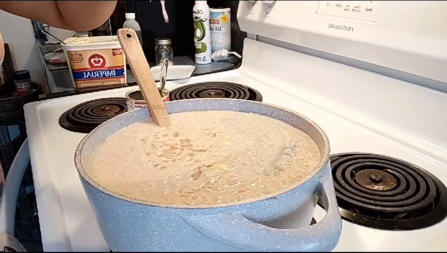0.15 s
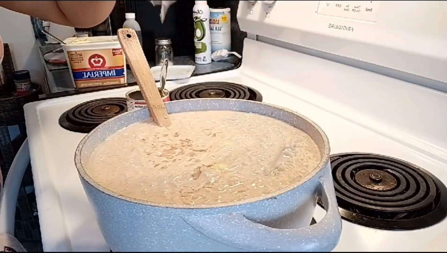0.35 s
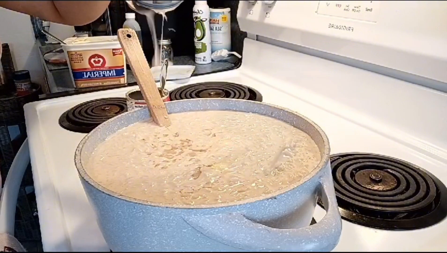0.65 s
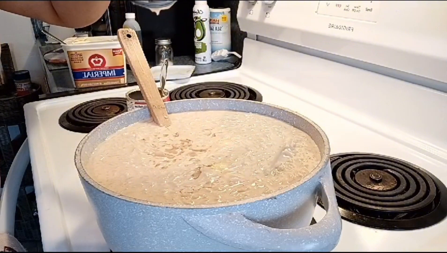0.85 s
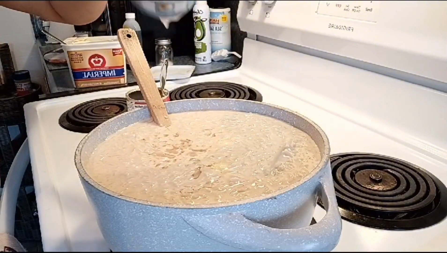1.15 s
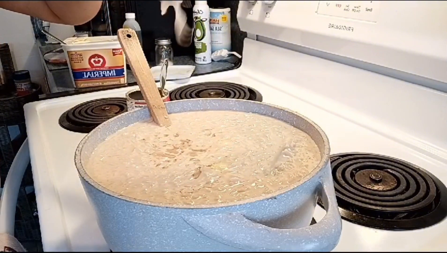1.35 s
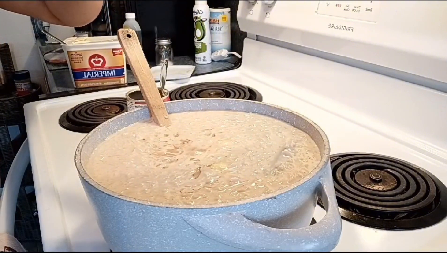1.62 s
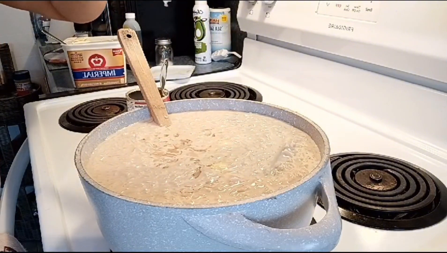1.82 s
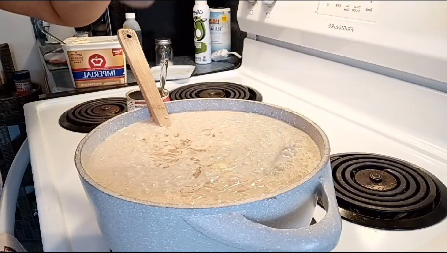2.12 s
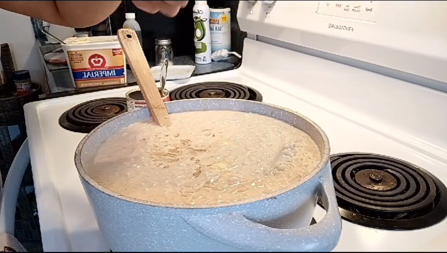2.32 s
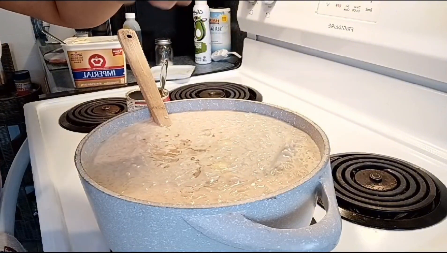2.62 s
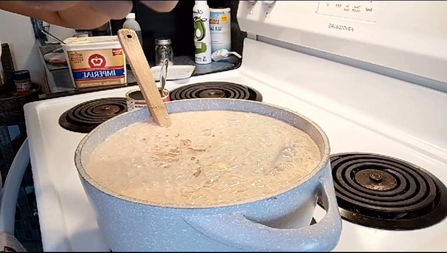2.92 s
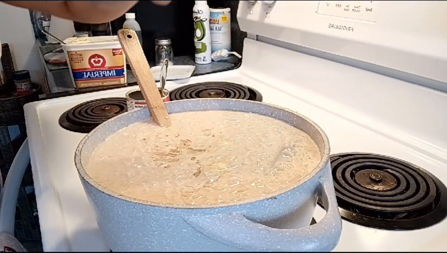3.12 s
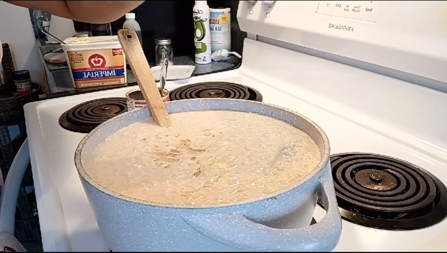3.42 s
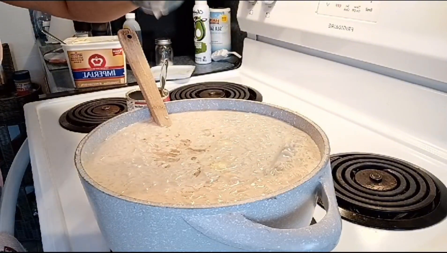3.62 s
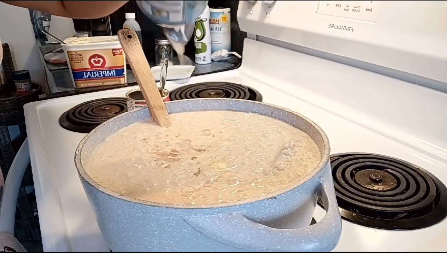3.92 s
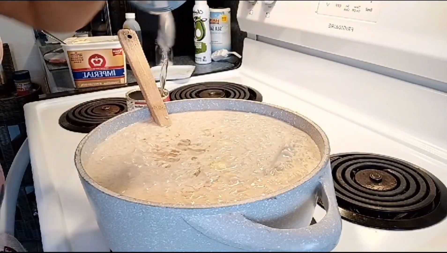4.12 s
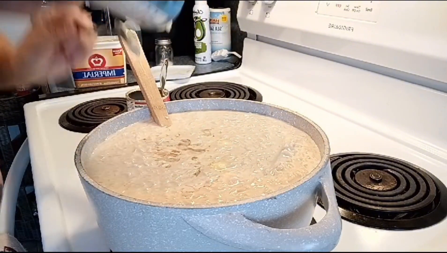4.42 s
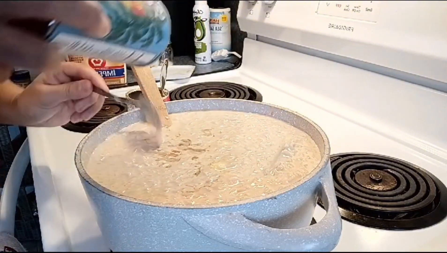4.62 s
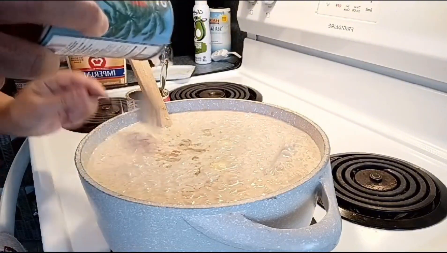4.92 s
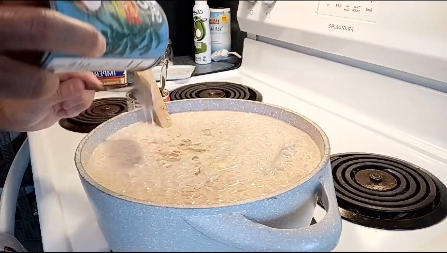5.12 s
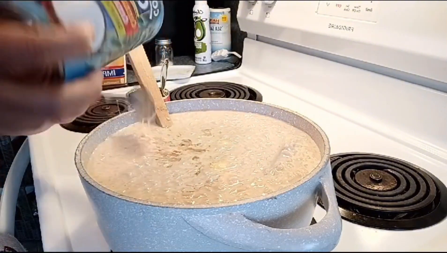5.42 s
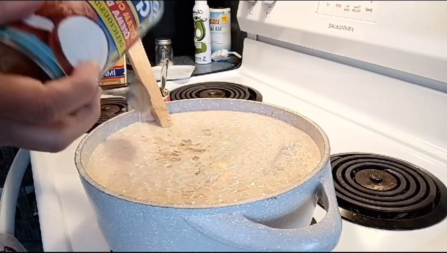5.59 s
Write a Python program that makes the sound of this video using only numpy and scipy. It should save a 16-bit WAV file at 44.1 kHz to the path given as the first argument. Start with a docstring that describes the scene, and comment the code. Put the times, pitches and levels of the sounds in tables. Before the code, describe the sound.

Close stereo pickup of a tin can being emptied with a spoon: irregular scratches and muffled tinny knocks, a quieter scratchy passage, a bright clang, a long harsh scrape ending in strong knocks, low lubricated wipes, then ten evenly spaced piercing metal clacks, slightly right, each with a clattering kitchen reverberation. A wavering appliance hum and low rumble lie beneath.

```python
"""Scraping out a tin can

A metal spoon scrapes and knocks thick contents out of a tin can held over a pot, in a small kitchen.
Stick-slip friction or a blow excites the air in the can, the modes of its tin wall and a gritty edge.
A few soft wipes groan with little grit; then can and spoon are rapped together ten times close to the
microphone, the last wipe among the raps. The kitchen answers, over rumble, hiss and a wavering hum."""
import sys
import numpy as np
from scipy import signal
from scipy.fft import rfft, irfft
from scipy.io import wavfile

SR = 44100
rng = np.random.default_rng(int(sys.argv[2]) if len(sys.argv) > 2 else 0)


def waveform_to_disk(signal):
    """Save audio, clipped to [-1, 1], as 16-bit WAV at the path in sys.argv[1]."""
    frames = np.transpose(np.atleast_2d(signal))
    scaled = np.clip(frames, -1, 1) * 32767
    samples = np.round(scaled).astype(np.int16)
    wavfile.write(sys.argv[1], SR, samples)


N = 253569
TIME = np.arange(N) / SR
RING = TIME[:28000]  # time axis of every impulse response [s]

# modes of the tin wall, before scatter and extra damping:
# (frequency [Hz], relative level [dB], t60 [s])
WALL_MODES = [(550, -25.5, 0.099), (621, -10.5, 0.29), (970, -24.5, 0.025), (1243, -3.5, 0.18),
              (1280, 3, 0.22), (1340, -23, 0.064), (1864, -13, 0.078), (2400, -8, 0.039), (2424.4, 4, .13),
              (3130, -11, 0.16), (3490, -3, 0.09), (4820, -23, 0.15), (5297, -21, .15), (5610, -22.5, .15),
              (6905, -12.5, 0.23)]


def scrapes(hollow_hz=621, wall_db=-1.0, bare_bright_db=8, coat_dull_db=21):
    """Stick-slip friction: short strokes of the spoon, gritty and bright where it is bare."""
    # short scrapes: (time [s], length [s], pressure level [dB], coating [0-1],
    # wall ring over the hollow, before wall_db [dB])
    strokes = [(0, 0.039, -60, 0, -4), (.118, .054, -60.5, 0.21, 1.5), (0.293, .02, -57, 0.34, -18),
               (0.647, .028, -63.5, 0.11, 6), (.685, .045, -50, 0.46, -18), (.762, .095, -53, 0.54, -7),
               (.854, .068, -61, .06, 2), (.938, 0.069, -48, 0.32, -7), (1.435, .084, -58.5, .13, -2.5),
               (1.549, .16, -62.5, .42, -7.5), (1.856, .064, -61.5, 0.5, -14.5),
               (1.989, 0.075, -73, 0.68, 1), (2.173, .045, -66, 0.1, -6.5), (2.335, .055, -66, .54, -6.5),
               (2.394, .053, -70.5, 0.16, -21), (2.481, .062, -63, 0.56, -20), (2.552, .13, -59, .04, -16),
               (2.683, .049, -61.5, 0.15, 11), (2.77, 0.099, -52.5, .33, -2.5), (2.89, .05, -64, 0.24, -11)]
    out = np.zeros(N)
    for s, length, db, coating, ring_db in strokes:
        air = stroke(length, db)
        ring = air * undb(ring_db + wall_db)
        edge = air * undb(grit_db(coating))
        bright_db = bare_bright_db - coat_dull_db * coating
        add(out, s, drag(hollow_hz, air, ring, edge, bright_db))
    return out


def long_scrape(hollow_hz=655, wall_db=0.5, edge_db=2, bright_db=3, release_db_per_s=400):
    """Sustained friction: one hard sweep round the can that dies away as the spoon lifts."""
    # levels before wall_db and edge_db:
    # (time [s], hollow level [dB], wall ring level [dB], grit level [dB])
    sweep = [(3.13, -67, -59, -73), (3.21, -48, -49, -60), (3.24, -42, -52, -43.5),
             (3.276, -35.5, -41.5, -46.5), (3.328, -35, -32.5, -39.5), (3.382, -38, -34, -48),
             (3.416, -35.5, -33.5, -41.5), (3.47, -44.5, -50, -44)]
    s, *levels = np.transpose(sweep)
    t = np.arange(s[0], s[-1] + .15, 1 / SR)
    release_db = release_db_per_s * np.maximum(t - s[-1], 0)
    air, ring, edge = (undb(np.interp(t, s, db) - release_db) for db in levels)
    out = np.zeros(N)
    add(out, s[0], drag(hollow_hz, air, ring * undb(wall_db), edge * undb(edge_db), bright_db))
    return out


def wipes(wall_db=-15, edge_db=-37, bright_db=-3):
    """Lubricated friction: a thickly coated spoon groans, mostly lower, almost without grit."""
    # (time [s], length [s], hollow pitch [Hz], pressure level [dB])
    soft_strokes = [(3.662, 0.152, 421, -46), (3.684, .15, 580, -46.5), (3.979, .13, 365, -55),
                    (5.469, .21, 558, -50)]
    out = np.zeros(N)
    for s, length, hz, db in soft_strokes:
        air = stroke(length, db)
        add(out, s, drag(hz, air, air * undb(wall_db), air * undb(edge_db), bright_db))
    return out


def stroke(length, db, crest=.42, curve=0.7):
    """Contact pressure: a stroke swells to a crest, at a share of its length, and eases off."""
    share = np.linspace(0, 1, int(length * SR))
    progress = np.interp(share, [0, crest, 1], [0, .5, 1])
    swell = np.abs(np.sin(np.pi * progress)) ** curve  # a lower power gives a fuller swell
    return swell / rms(swell) * undb(db)


def grit_db(coating, bare_db=15, coat_loss_db=45.5):
    """Damping at the contact: contents on the spoon muffle the grit, given as level over the hollow."""
    return bare_db - coat_loss_db * coating


def drag(hz, air, ring, edge, bright_db, contact_hz=1800, octave_db=20, steady_db=55, catch_db=2.5):
    """Source and resonators: coarse slips shake the hollow and the tin, fine ones hiss."""
    size = len(air)
    coarse = friction(size, slips_per_s=300, spread_db=5.5, slide=0.45)
    fine = coarse + friction(size, slips_per_s=2500, spread_db=7.0, slide=0.59)
    # the edge catches and lets go: a level drawn every 5 ms, held after the last draw
    catch = np.interp(TIME[:size], np.arange(64) * .005, rng.standard_normal(64))
    fine = fine * undb(catch_db * catch)
    tilt = [(1800, -bright_db / 2), (5500, bright_db / 2), (10000, bright_db)]
    hiss = colour(grit(t60=0.018), tilt)
    # a coated spoon has little grit: it pushes the wall softly and groans on a steadier pitch
    cut_hz = contact_hz * 2 ** (gap_db(edge, ring) / octave_db)
    push = soften(soften(coarse, cut_hz), cut_hz)
    swell_s = 0.0032 * 2 ** (max(gap_db(air, edge), 0) / steady_db)
    groan = rubbed(coarse, hollow(hz, swell_s), air)
    wall = rubbed(push, modes(WALL_MODES, scatter_db=-1.5), ring)
    return groan + wall + rubbed(fine, hiss, edge)


def friction(size, slips_per_s, spread_db, slide):
    """Stick-slip force of a sliding edge: uneven random slips over a fine sliding noise."""
    slipping = rng.random(size) < slips_per_s / SR
    strength = 2 * rng.random(size) - 1
    slips = slipping * undb(spread_db * strength)
    return slips / rms(slips) + slide * rng.standard_normal(size)


def rubbed(force, body, pressure):
    """Forced vibration: a body convolved with a force, with the energy of the pressure on it."""
    return unit(signal.fftconvolve(force * pressure, body)) * np.sqrt(np.sum(pressure ** 2))


def knocks(bare_ring_db=3, ring_loss_db=26, bare_hz=2000, coat_octaves=1.1, coated_t60=0.44):
    """Impact excitation: a coat of contents softens the contact and damps the can."""
    # spoon knocks inside the can:
    # (time [s], hollow pitch [Hz], hollow level before damping [dB], coating [0-1])
    hits = [(.2031, 600, -35.5, 0.77), (.2983, 570, -52, 0.57), (.556, 667, -36, .7),
            (.664, 810, -43.5, 0.45), (.698, 602, -43, .65), (.729, 570, -47.5, .97), (.819, 578, -42.5, 1),
            (0.8596, 640, -46, .09), (1.3078, 620, -36, .27), (3.402, 610, -33.5, .58),
            (3.414, 683, -36, 0.48), (3.4835, 611, -27.5, 0.84)]
    # one hard clang that sets the whole wall ringing: (time [s], hollow pitch [Hz],
    # hollow level [dB], wall ring level [dB], grit level [dB], contact hardness [Hz])
    clang = (2.9361, 668, -33.5, -23, -35.5, 5900)
    out = np.zeros(N)
    for s, hz, db, coating in hits:
        ring_db = db + bare_ring_db - ring_loss_db * coating
        hardness_hz = bare_hz * 2 ** (-coat_octaves * coating)
        hit = blow(hz, db, ring_db, db + grit_db(coating), hardness_hz)
        add(out, s, hit * fade(coated_t60) ** coating)
    add(out, clang[0], blow(*clang[1:]))
    return out


def blow(hz, air_db, ring_db, edge_db, hardness_hz, first_swing=0.4):
    """Contact time sets bandwidth: a bare, hard blow on the wall wakes the high modes."""
    # the contents soak up the first wide swings, then a thin ring remains
    wall = modes(WALL_MODES, scatter_db=-1) * (1 + first_swing * fade(t60=0.2))
    air = attack(hollow(hz, swell_s=0.0027), air_db)
    ring = attack(soften(wall, hardness_hz), ring_db)
    return air + ring + attack(grit(t60=.045), edge_db)


def hollow(hz, swell_s):
    """Resonance of an enclosed body of air: a few cycles that swell and die."""
    return unit(RING * np.exp(-RING / swell_s) * np.sin(2 * np.pi * hz * RING))


def modes(table, scatter_db):
    """Modal synthesis: decaying partials whose weights depend on the spot that is touched."""
    out = 0
    for hz, db, t60 in table:
        weight = undb(db + scatter_db * rng.standard_normal())
        out = out + weight * fade(t60) * np.sin(2 * np.pi * hz * RING)
    return out


def grit(t60):
    """High modal density: the quickly damped high modes of thin tin merge into coloured noise."""
    # steel edge on tin: (frequency [Hz], relative level per Hz [dB])
    edge_spectrum = [(200, -17.5), (400, -13.5), (1000, -3), (1450, -5.5), (1850, -1.5), (2700, -6),
                     (3200, -2.5), (3900, -9.5), (4600, -2.5), (5500, -1), (6700, -14), (8000, -28.5),
                     (9500, -22.5), (13500, -27), (15500, -14.5)]
    return unit(colour(rng.standard_normal(len(RING)) * fade(t60), edge_spectrum))


def soften(x, hz):
    """Low-pass action of contact: a softer contact pushes longer and loses its treble."""
    return signal.sosfilt(signal.butter(2, min(hz, SR / 3), fs=SR, output="sos"), x)


def raps(rim_hz=6600, right_db=3.5, clack_db=-1, clatter_db=-1, echo_db=-6, drift=0.63, tint=0.55,
         boom_hz=108, boom_db=-13.0, room_db=-15.5, lower_db=9, lower_slope=0.29, lower_db_per_hz=0.0044):
    """Direct and diffuse sound: a sharp clack of the rim, to the right, then a clatter fills the room."""
    # raps that shake the rest out:
    # (time [s], clack pitch [Hz], strength before clack_db [dB], edge brightness [dB])
    hits = [(4.3222, 6300, -30, -20), (4.4401, 6400, -21.5, 11.5), (4.6028, 6460, -21, -1),
            (4.7779, 6400, -19.5, 1.5), (4.9366, 6520, -18, 1), (5.0913, 6840, -19, 3),
            (5.2492, 6850, -18.5, 17), (5.407, 6820, -18, 17), (5.5763, 6700, -21, 13.5),
            (5.7335, 6560, -16, 21)]
    # modes of the rim held against the spoon, before pitch shift and scatter:
    # (frequency [Hz], relative level [dB], t60 [s])
    rim_modes = [(930, -11.5, 0.053), (2860, -11.5, 0.018), (3000, -38, 0.082), (3120, -7, 0.017),
                 (3210, -28.5, 0.23), (3986, -9, 0.023), (6400, 7.5, 0.014), (6850, 15.5, 0.011),
                 (8950, -2, 0.0097), (10760, -6, 0.0039), (14940, -2, 0.01)]
    # clatter of a rap as it fills the room: (frequency [Hz], relative level per Hz [dB])
    clatter_spectrum = [(45, -25), (108, 2.5), (145, 0.5), (235, 7), (330, 4.5), (850, 6.5), (1300, 1.5),
                        (2200, -4.5), (3000, -7.5), (4800, -6.5), (6600, 0.5), (7700, -5.5), (13500, -11),
                        (15200, -13)]
    out = np.zeros((2, N))
    room = kitchen(build_s=0.00066, bass_lag_s=0.039)
    for s, hz, near, edge in hits:
        far = near + room_db  # the room answers in proportion
        # a glancing or high-pitched rap drives the lower rim modes harder
        lower = lower_db + lower_slope * abs(edge) + lower_db_per_hz * (hz - rim_hz)
        # the point of contact shifts the damped modes and decides which ones speak
        rim = [(f * (hz / rim_hz if t60 < .1 else 1), db, t60) for f, db, t60 in rim_modes]
        spot = np.array([(1500, 0), (3000, lower), (5000, 0), (7500, 0), (12000, edge)])
        # an impulse, then the edges grind briefly; each microphone port sees another side of the can
        force = 0.11 * rng.standard_normal((2, len(RING))) * fade(t60=0.027)
        force[:, 0] += 1
        struck = signal.fftconvolve(force, modes(rim, scatter_db=-4.5)[None], axes=1)
        clack = colour(struck[:, :len(RING)], spot)
        clack[0] = np.roll(clack[0], 1)  # it reaches the left port one sample later
        # the can moves between raps, so the echoes change
        echoes = room + drift * kitchen(build_s=.0006, bass_lag_s=0.053)
        clatter = colour(colour(echoes, clatter_spectrum), spot * [1, tint])
        ringing = signal.fftconvolve(clack, echoes, axes=1)
        add(out, s, attack(clack, near + clack_db, count=88) * pan(right_db))
        add(out, s, attack(clatter, far + clatter_db, count=2600))
        add(out, s, attack(ringing, far + echo_db, count=2600))
        # a low mode of the room swells after the clack
        boom = hollow(boom_hz * (1 + 0.075 * rng.standard_normal()), swell_s=0.017)
        add(out, s + .022, attack(boom, far + boom_db, count=2600))
    return out


def kitchen(build_s, bass_lag_s):
    """Reverberation: echoes build up, lows late, and die exponentially band by band."""
    # (frequency [Hz], t60 [s])
    decay_times = [(100, 1), (500, 0.36), (2000, 0.35), (6500, 0.39), (10000, 0.3), (16000, 0.18)]
    noise = rfft(diffuse(len(RING)))
    hz = np.fft.rfftfreq(len(RING), 1 / SR)
    centres = np.geomspace(100, 16000, 9)
    out = 0
    for f, band in zip(centres, np.eye(len(centres))):
        echoes = irfft(noise * lookup(np.c_[centres, band], hz))  # overlapping triangular bands
        rise_s = build_s + bass_lag_s * np.sqrt(centres[0] / f)
        rise = 1 - np.exp(-(RING / rise_s) ** 2)
        out = out + echoes * rise * fade(lookup(decay_times, f))
    return out


def diffuse(size, wide_hz=350):
    """Diffuse-field coherence: stereo noise, alike in the bass and wide in the treble."""
    mid, side = rfft(rng.standard_normal((2, size)))
    hz = np.fft.rfftfreq(size, 1 / SR)
    side = side * hz / (hz + wide_hz)
    return irfft(np.array([mid + side, mid - side]), size)


def room_tone(air_db=-68.5, waver_db=4):
    """Stationary noise and tones: low rumble and faint hiss, with a wavering appliance hum."""
    # room noise: (frequency [Hz], relative level per Hz [dB])
    air_spectrum = [(30, -16), (50, -7), (75, 3.5), (120, 3.5), (200, -2.5), (400, -6.5), (800, -23.5),
                    (1600, -29), (3200, -29), (6300, -34.5), (10000, -31), (13000, -40.5), (15500, -31.5)]
    # appliance hum: (frequency [Hz], RMS level about which it wavers [dB])
    hum_tones = [(70, -72), (120, -74)]
    out = colour(diffuse(N), air_spectrum) * undb(air_db)
    knots = np.linspace(0, TIME[-1], 70)
    for hz, db in hum_tones:
        waver, wander = (np.interp(TIME, knots, row) for row in rng.standard_normal((2, 70)))
        level = np.sqrt(2) * undb(db + waver_db * waver)
        out = out + level * np.sin(2 * np.pi * hz * TIME + wander)  # the phase wanders [rad]
    return out


def undb(db):
    """Logarithmic level: decibels to amplitude gain."""
    return 10 ** (np.asarray(db) / 20)


def rms(x):
    """Effective value: root mean square, kept above zero."""
    return np.sqrt(np.mean(x ** 2)) + 1e-18


def gap_db(a, b):
    """Level difference: a over b."""
    return 20 * np.log10(rms(a) / rms(b))


def unit(x):
    """Energy normalisation: scale a response to unit energy."""
    return x / np.sqrt(np.sum(x ** 2))


def attack(x, db, count=441):
    """Onset level: scale a hit so that its first samples have this RMS level."""
    return x * undb(db) / rms(x[..., :count])


def fade(t60):
    """Exponential decay: 60 dB down after t60 seconds."""
    return np.exp(-np.log(1000) * RING / t60)


def pan(right_db):
    """Level-difference stereo: gains of the left and right channel."""
    return undb(np.array([[-right_db], [right_db]]) / 2)


def add(out, s, x):
    """Superposition: mix x into out from time s."""
    i = int(s * SR)
    out[..., i:i + x.shape[-1]] += x[..., :max(N - i, 0)]


def lookup(points, hz):
    """Logarithmic frequency axis: interpolate (Hz, value) points."""
    f, value = np.transpose(points)
    return np.interp(np.log(hz + 1), np.log(f), value)


def colour(x, points, size=4096):
    """Minimum-phase filtering by folded cepstrum: shapes white noise while keeping its power."""
    gain = undb(lookup(points, np.fft.rfftfreq(size, 1 / SR)))
    cepstrum = irfft(np.log(gain))
    cepstrum[1:size // 2] *= 2
    cepstrum[size // 2 + 1:] = 0
    response = unit(irfft(np.exp(rfft(cepstrum))))
    if x.ndim == 2:
        response = response[None]
    return signal.fftconvolve(x, response, axes=-1)[..., :x.shape[-1]]


def scene(scrape_wet_db=-3.5, knock_wet_db=-3.0, right_db=0.76, lowest_hz=340):
    """Superposition of direct and reverberant sound: spoon and can, raps and room tone."""
    scraping = scrapes() + long_scrape() + wipes()
    knocking = knocks()
    room = np.sqrt(2) * unit(kitchen(build_s=0.0037, bass_lag_s=0.0067))
    sent = undb(scrape_wet_db) * scraping + undb(knock_wet_db) * knocking
    can = scraping + knocking + signal.fftconvolve(sent[None], room, axes=1)[:, :N]
    # a small can radiates no bass
    can = signal.sosfilt(signal.butter(2, lowest_hz, "highpass", fs=SR, output="sos"), can)
    return can * pan(right_db) + raps() + room_tone()


def record(dry):
    """Band limitation: the recorder cuts the top above 15.9 kHz."""
    return signal.sosfilt(signal.ellip(8, .2, 70, 15900, fs=SR, output="sos"), dry)


dry = scene()
out = record(dry)
waveform_to_disk(out)
```